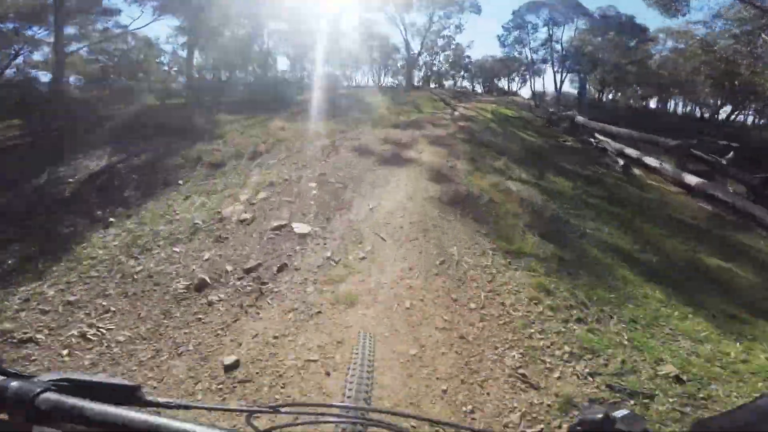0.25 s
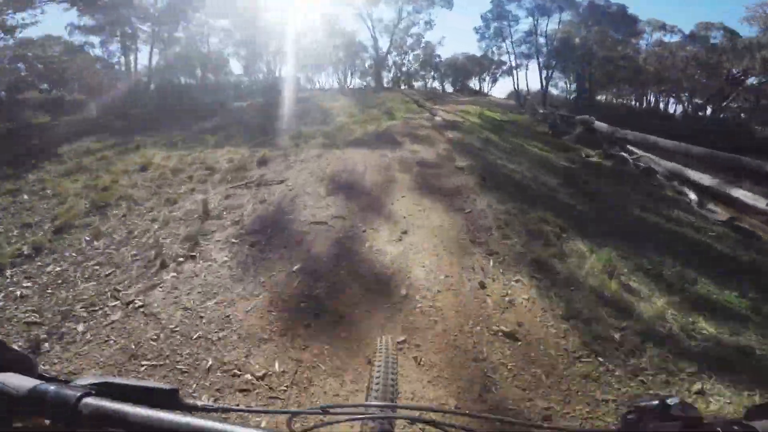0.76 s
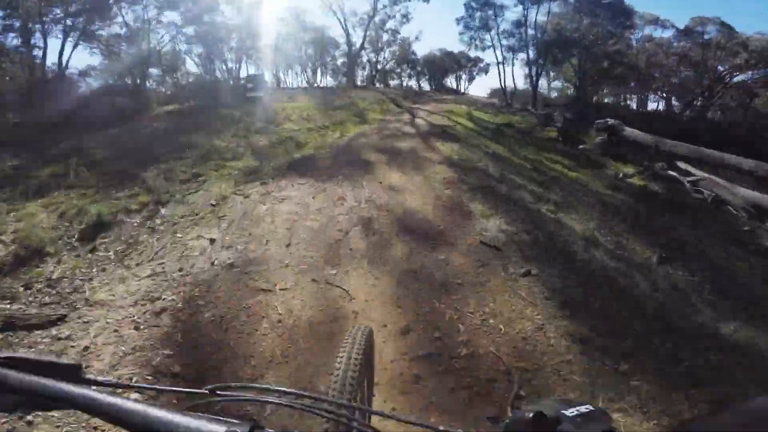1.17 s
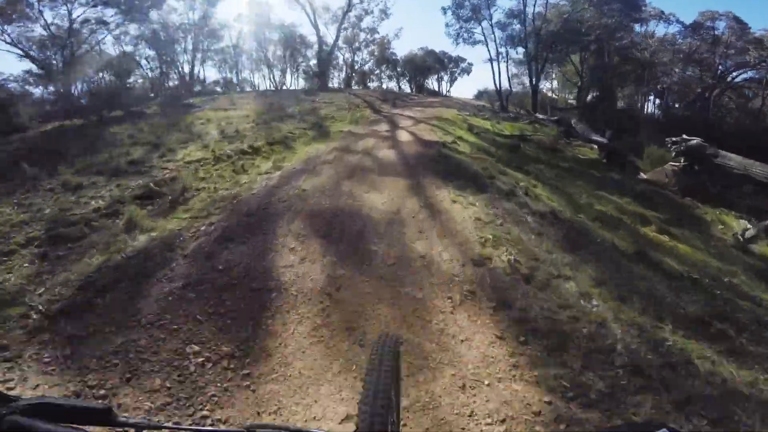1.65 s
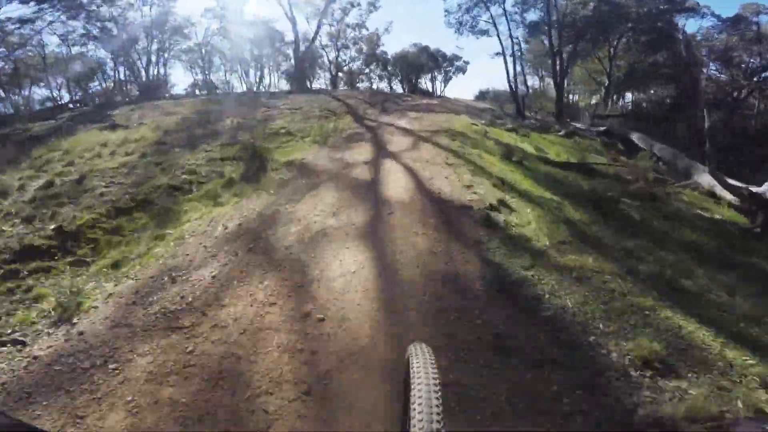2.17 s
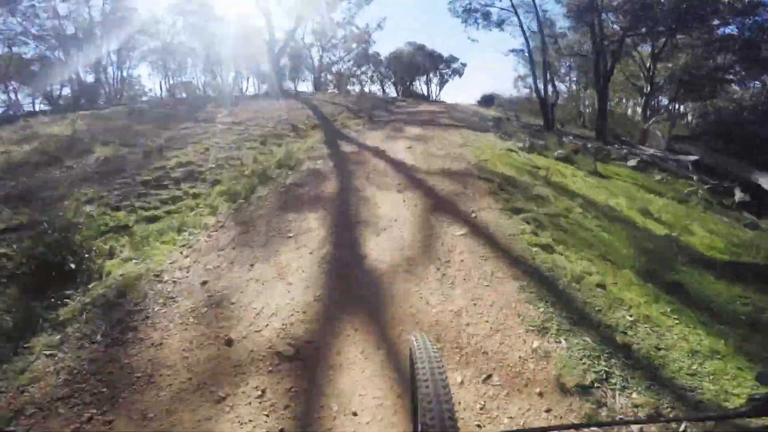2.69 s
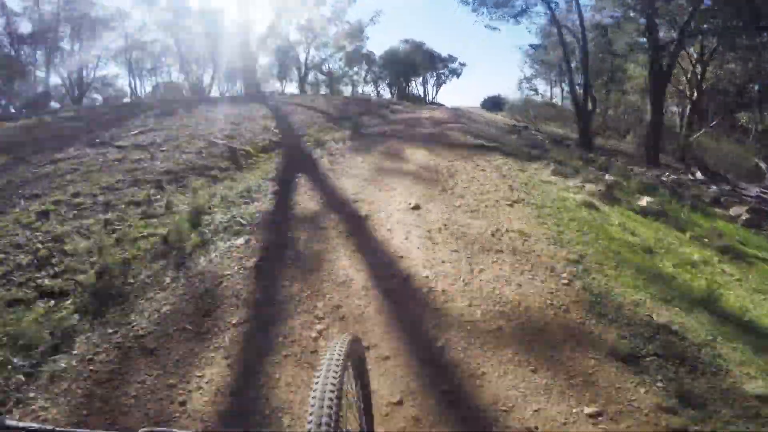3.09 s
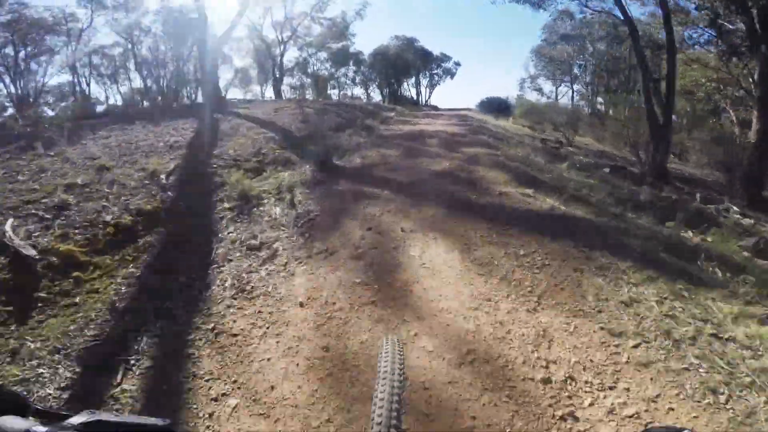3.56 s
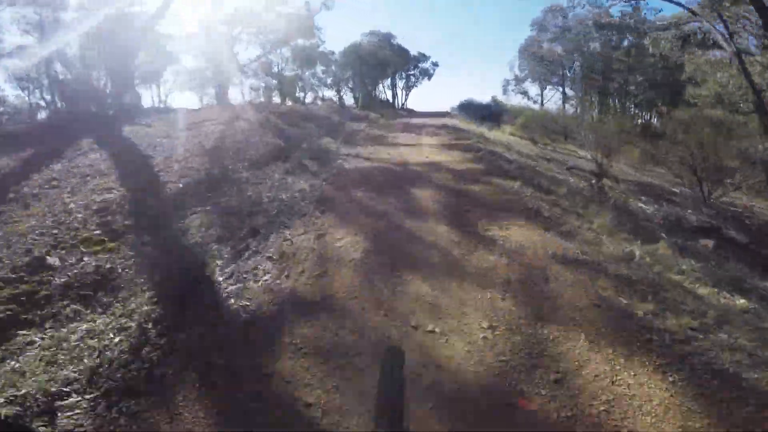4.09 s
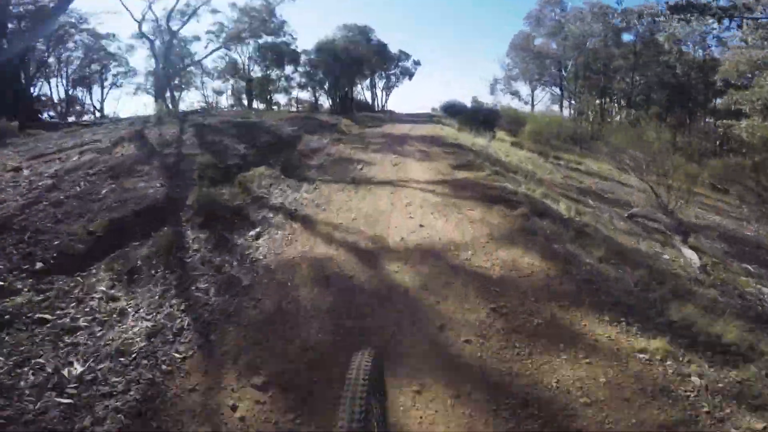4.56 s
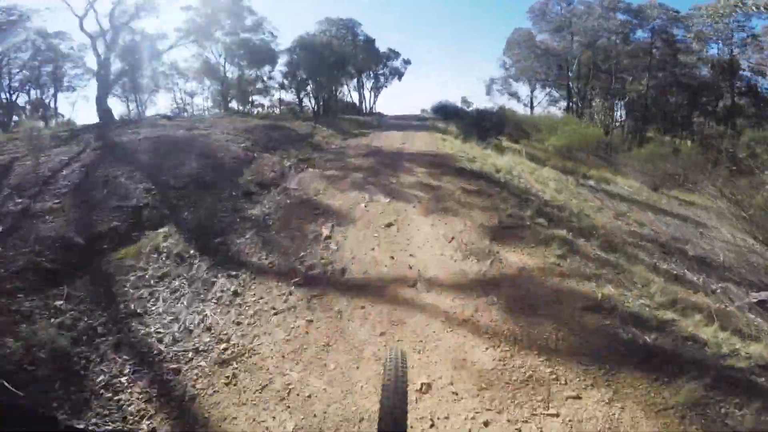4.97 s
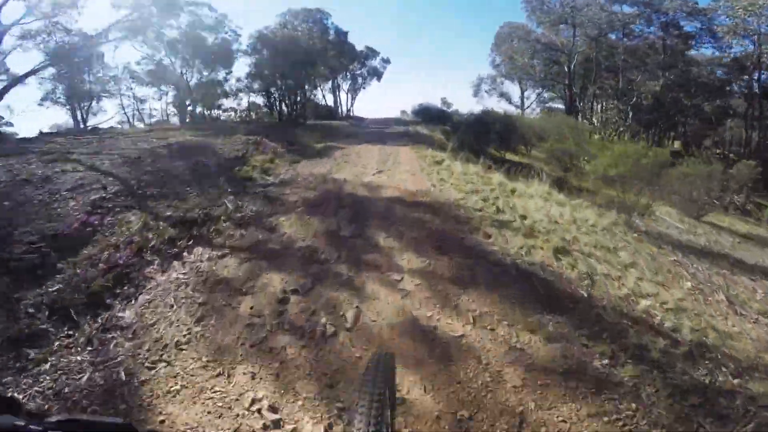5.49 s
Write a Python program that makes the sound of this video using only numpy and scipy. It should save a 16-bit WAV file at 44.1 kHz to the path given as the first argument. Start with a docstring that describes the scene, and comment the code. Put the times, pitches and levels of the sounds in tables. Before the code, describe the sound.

A mountain bike climbs a gravel trail, heard in mono from the rider's chest, close and dry in open air. Low wind buffeting thumps the microphone in short irregular gusts, while knobbly tyres make a low drumming rumble, gritty crunch and fine sandy hiss, swelling with every pedal push, about every 0.3 seconds. In the first 0.1 seconds chain and cables clatter brightly; lighter chatter follows around the strokes. Stones pop with dry cracks throughout, notably near 0.3, 1.1, 2.7, 4.15 and 5.15 seconds. Dull rock knocks land around 0.57, 1.6, 3.45 and 3.95. Tiny high steel pings touch at 0.34, 0.8, 1.3 and, very faintly, 3.65. Brief gravel showers crunch near 1.84, 3.5 and 5.1 to 5.3. From about 2 seconds wind and tyres ease, the strokes spreading to nearly half a second. Faint raspy squeaks come at 4.26, 4.35 and 4.66. It stops at about 5.7, still rolling.

```python
"""Mountain bike climbing a gravel trail

Close and outdoors, from a microphone on the rider's chest: gusts of low-passed noise thump it, and noise and
random scuffs make the knobbly tyres rumble and crunch over dirt, swelling with every pedal stroke.
Filtered cracks are stones popping loose; noise bursts are chain and cables chattering. Small steel parts ping,
rocks knock, something squeaks late on. The strokes spread out, and wind and tyres ease as the climb slows the bike.
"""
import sys
import numpy as np
from scipy import signal
from scipy.fft import rfft, irfft
from scipy.io import wavfile
from scipy.ndimage import uniform_filter1d

SR = 44100
rng = np.random.default_rng(int(sys.argv[2]) if len(sys.argv) > 2 else 0)


def master(y):
    """Save y as 16-bit WAV."""
    cut = np.clip(np.atleast_2d(y).T, -1, 1)
    pcm = np.round(cut * 32767)  # scale
    wavfile.write(sys.argv[1], SR, pcm.astype(np.int16))


N = 253134
TIME = np.arange(N) / SR

# pedal strokes pressing the tyres into the dirt: (time of hardest push [s], rumble swell [dB], crunch swell [dB])
STROKES = [(-.03, 6, 7.5), (.24, 2, 5), (.55, 3, 4), (.85, 5.5, 3.5), (1.14, 0.5, 7), (1.48, 4.5, 5.5),
           (1.85, 4, 6), (2.18, 4.5, 4), (2.5, 5, 5), (2.82, 5, 2.5), (3.2, 2.5, 4), (3.56, 4.5, 5),
           (3.95, 5, 5), (4.36, 0, 5), (4.83, 3, 6.5), (5.24, 1.5, 6), (5.71, 5.5, 3.5)]


def undb(db):
    """Decibels to gain."""
    return 10 ** (np.asarray(db) / 20)


def unit(x):
    """Scale to rms 1."""
    return x / np.sqrt(np.mean(x ** 2))


def curves(table):
    """Each column of a table, joined by straight lines in time."""
    s, *columns = np.transpose(table)
    return [np.interp(TIME, s, c) for c in columns]


def swells(table):
    """Level in dB of smooth humps, one for each row (time of centre [s], length [s], swell [dB])."""
    return sum(db * np.cos(np.pi * np.clip((TIME - s) / length, -.5, .5)) ** 2 for s, length, db in table)


def add(out, s, x):
    """Mix a short sound in at time s."""
    i = max(int(s * SR), 0)
    out[i:i + len(x)] += x[:max(N - i, 0)]


def decay(t, t60):
    """Exponential dying away, 60 dB down after t60 seconds."""
    return np.exp(-np.log(1000) * t / t60)


def resonate(x, hz, width):
    """Two-pole resonance, gain 1 at its centre; width in Hz."""
    hz = min(hz, SR * .44)
    return signal.lfilter(*signal.iirpeak(hz, hz / min(width, SR / 4), fs=SR), x)


def band(x, hz, octaves):
    """Steep band-pass reaching the given octaves either side of hz."""
    edges = np.clip(hz * 2. ** (np.array([-1, 1]) * octaves), 20, SR * .46)
    return signal.sosfilt(signal.butter(3, edges, "bandpass", fs=SR, output="sos"), x)


def colour(x, points, size=16384):
    """Causal filter with the given (Hz, dB) spectrum, so that clicks keep their sharp front; rms 1."""
    hz, db = np.transpose(points)
    bins = np.maximum(np.fft.rfftfreq(size, 1 / SR), 1)
    cepstrum = irfft(np.log(undb(np.interp(np.log(bins), np.log(hz), db))))
    # folding the cepstrum onto positive times makes the filter minimum-phase
    cepstrum[1:size // 2] *= 2
    cepstrum[size // 2 + 1:] = 0
    impulse_response = irfft(np.exp(rfft(cepstrum)))
    return unit(signal.fftconvolve(x, impulse_response)[:N])


def walk(rate):
    """Random wandering through about rate new values a second, rms 1."""
    knots = rng.standard_normal(N // 20)
    return unit(np.interp(TIME * rate, np.arange(len(knots)), knots))


def steady(x, span):
    """Take out swells slower than span seconds, leaving the fast flutter."""
    return x / np.sqrt(uniform_filter1d(x ** 2, max(int(span * SR), 2)) + 1e-4)


def halvings():
    """How many times the speed has halved since the start."""
    # the bike loses speed on the climb: (time [s], share of its starting speed)
    speed_points = [(0, 1.0), (1.5, 0.99), (2.2, 0.79), (3.7, .74), (4.5, 0.69), (5.3, 0.61), (5.74, 0.64)]
    speed, = curves(speed_points)
    return -np.log2(np.maximum(speed, .1))


def pedalling():
    """Swell of rumble and of crunch in dB: greatest mid-stroke, gone as the cranks pass dead centre."""
    sharpness = 0.71  # higher makes each push narrower
    turn = np.interp(TIME, np.transpose(STROKES)[0], np.arange(len(STROKES)))
    push = (np.cos(np.pi * turn) ** 2) ** sharpness
    return [push * swell_db for swell_db in curves(STROKES)]


def around_strokes(db, hz, scatter_s, spread_db, octaves, count):
    """Rows (time [s], level [dB], pitch [Hz]) of small random events, count of them near each push."""
    pushes = np.repeat(np.transpose(STROKES)[0], count)
    when, force, pitch = np.clip(rng.standard_normal((len(pushes), 3)), -2, 2).T
    rows = zip(pushes + scatter_s * when, db + spread_db * force, hz * 2 ** (octaves * pitch))
    return [row for row in rows if row[0] > 0]


def wind():
    """Eddies thump the microphone, gust by gust, easing as the bike slows."""
    # spectrum of the buffeting: (frequency [Hz], relative level per Hz [dB])
    wind_colour = [(8, -28), (20, -2), (38, 0.5), (60, -3), (95, -10), (150, -19.5), (300, -41),
                   (900, -81.5)]
    # gusts on the microphone: (time of centre [s], length [s], swell [dB])
    gusts = [(.005, 0.046, 7), (.125, 0.11, 5), (0.532, 0.042, 4.5), (.615, 0.069, 6), (1.127, 0.3, 1),
             (1.34, 0.071, 9.5), (1.447, 0.089, 7), (1.776, 0.028, 7.5), (1.9, 0.24, 4.5),
             (2.337, 0.055, 7), (2.507, 0.059, 10.5), (2.718, 0.22, 6), (3.087, 0.043, 9),
             (3.267, 0.18, 8.5), (3.625, 0.065, 8.5), (4.33, 0.1, 5.5), (4.446, 0.13, 7), (4.57, 0.2, 5.5),
             (4.93, 0.22, 4.5)]
    start_db, db_per_halving = -23, 10.5  # level between gusts at the starting speed; loss when speed halves
    eddies = steady(colour(rng.standard_normal(N), wind_colour), span=0.079)
    return eddies * undb(start_db - db_per_halving * halvings() + swells(gusts))


def grains(rate, spread_db, low_hz, high_hz, width_share, scuff_s, count=6):
    """Stones of several sizes scuff at random, many faint and few loud; small ones sound higher."""
    out, fade = 0, np.exp(-1 / (scuff_s * SR))
    for hz in np.geomspace(low_hz, high_hz, count):
        struck = rng.random(N) < rate / count / SR
        force = undb(spread_db * np.minimum(rng.exponential(size=N), 4))
        # two equal poles let each contact build up briefly before it fades
        power = signal.lfilter([1], np.poly([fade, fade]), struck * force ** 2 + 1e-12)
        scuffs = np.sqrt(power) * rng.standard_normal(N)
        out = out + resonate(scuffs, hz, hz * width_share)
    return unit(out)


def pebbles(rate, spread_db, centre_hz, octaves, cycles, size=512):
    """Single pebbles clink, each at its own pitch and for a few cycles."""
    out, t = np.zeros(N), np.arange(size) / SR
    for when, pitch, force, ring in rng.random((4000, 4))[:int(rate * N / SR)]:
        hz = centre_hz * 2 ** (octaves * (2 * pitch - 1))
        age = hz * t / (cycles * (.5 + ring))
        db = spread_db * min(-np.log(1 - force), 3)
        add(out, when * N / SR, undb(db) * age * np.exp(-age) * np.sin(2 * np.pi * hz * t))
    return unit(out)


def tyres():
    """Knobs drum on hard dirt, crush gravel in uneven patches and throw up fine sand."""
    # spectra of drumming, gravel and sand: (frequency [Hz], relative level per Hz [dB])
    rumble_colour = [(50, -20.5), (110, -2.5), (160, -2), (200, -2.5), (245, 1.5), (280, -3), (400, -7.5),
                     (520, -9.5), (700, -17.5), (1100, -19), (3000, -57)]
    gravel_colour = [(250, -12), (600, 6), (900, 3.5), (1200, -1.5), (1550, 5), (1950, 0.5), (2650, 5.5),
                     (3300, 2), (4200, -3), (5500, -13), (9000, -22.5), (16000, -36)]
    sand_colour = [(2500, -17), (4500, 7.5), (5700, 4.5), (6800, 4.5), (8500, -5.5), (10000, -6),
                   (10700, -7), (11600, -9), (12500, -10), (14800, -15), (16000, -31)]
    # ruts and ridges under the wheels: (time of centre [s], length [s], rumble swell, or dip if negative [dB])
    bumps = [(.005, 0.028, 6), (.69, 0.2, 3), (1.6, .05, 7.5), (2.215, .06, 2), (3.24, .1, 5),
             (3.6, 0.15, 2.5), (3.945, 0.038, 7), (4.06, 0.041, -3.5), (5.57, 0.066, 2.5)]

    # levels in dB: at the starting speed, less a loss for each halving of speed, plus the swells
    slowed = halvings()
    rumble_swell, crunch_swell = pedalling()
    rumble_db = -35.5 - 11.5 * slowed + rumble_swell + swells(bumps)
    crunch_db = -40 - 4 * slowed + crunch_swell
    sand_db = -52.5 - 8 * slowed + 0.9 * crunch_swell

    patches = walk(rate=110)  # one uneven ground roughens all three layers, by differing amounts in dB
    drumming = steady(colour(rng.standard_normal(N), rumble_colour), span=0.066) * undb(1.0 * patches)

    grinding = grains(rate=2500, spread_db=2.0, low_hz=910, high_hz=5960, width_share=0.86, scuff_s=0.00037)
    clinks = pebbles(rate=420, spread_db=4, centre_hz=2294, octaves=1.164, cycles=1.9)
    gravel = colour(grinding + undb(-11.5) * clinks + undb(-6) * rng.standard_normal(N), gravel_colour)
    gravel = steady(gravel * undb(2.4 * patches), span=0.093)

    spray = grains(rate=350, spread_db=9.5, low_hz=4930, high_hz=12700, width_share=0.57, scuff_s=0.0003)
    ticks = pebbles(rate=130, spread_db=5.5, centre_hz=7140, octaves=0.84, cycles=4.0)
    sand = colour(spray + undb(-1.5) * ticks + undb(6.5) * rng.standard_normal(N), sand_colour)
    sand = steady(sand * undb(2.8 * patches), span=0.2)
    return drumming * undb(rumble_db) + gravel * undb(crunch_db) + sand * undb(sand_db)


def rattles(size=4096):
    """Hard parts chatter together in a burst that swells, rings briefly at its pitch and dies."""
    # clatters of chain and cables on the frame:
    # (time [s], level before the common trim [dB], pitch [Hz], 60 dB decay of the chatter [s])
    clatters = [(0.0287, -8, 3050, .025), (.0285, -13, 7200, 0.016), (0.0365, -6.5, 3460, 0.024),
                (.036, -13, 7100, 0.027), (0.0667, -13, 6500, 0.023), (0.0658, -11.5, 4160, 0.027),
                (.073, -9, 11200, 0.005), (.236, -18.5, 5300, 0.015), (.4768, -11.5, 11600, .0098),
                (.564, -22, 4440, 0.032), (1.3975, -21.5, 5460, .026), (1.4516, -21, 5500, 0.034),
                (1.569, -25.5, 8050, 0.01), (1.587, -25, 9500, .015), (2.102, -31, 9050, 0.011),
                (2.49, -19, 5900, 0.055), (3.083, -28, 6000, .036), (3.157, -26, 6040, 0.025),
                (2.8178, -19, 3830, 0.027), (3.9, -29, 6700, .05), (3.9468, -17, 3470, .013),
                (4.32, -23, 3430, .03), (4.527, -21.5, 3580, 0.011), (4.802, -25, 3900, .022),
                (5.0366, -19, 6600, 0.0058), (5.23, -17, 3550, .02), (5.261, -17, 3560, 0.03),
                (5.596, -25, 5640, .025), (5.631, -25.5, 6100, .025), (5.66, -27, 5230, .02)]
    trim_db, light_t60 = -6.5, 0.031
    out, t = np.zeros(N), np.arange(size) / SR
    # light chatter of the chain around each push
    light = around_strokes(db=-28, hz=6100, scatter_s=.06, spread_db=-2.0, octaves=0.32, count=1)
    for s, db, hz, t60 in clatters + [(*row, light_t60) for row in light]:
        chatter = rng.standard_normal(size) * decay(t, t60) * (1 - np.exp(-t / 0.00017))
        ring = resonate(band(chatter, hz, octaves=0.33), hz, width=240)
        body = resonate(chatter, hz, width=1300)
        clack = band(chatter, hz, octaves=0.47) + undb(9) * body + undb(10.5) * ring
        add(out, s - .0005, clack / np.abs(clack).max() * undb(db + trim_db))
    return out


def stones(size=2048):
    """A pinched stone snaps free with a dry crack and scuffs briefly; its pitch picks which modes ring most."""
    # stones popping from under the tyres: (time [s], level before the common trim [dB], pitch [Hz])
    pops = [(.0384, -13, 1670), (0.075, -11.5, 2100), (.269, -11.5, 1770), (.3077, -16.5, 1860),
            (.5654, -15, 1800), (1.041, -17, 2600), (1.1331, -11.5, 2500), (1.152, -14.5, 1950),
            (1.1983, -14, 2440), (1.5477, -14, 2470), (1.588, -15, 1860), (1.679, -13.5, 2660),
            (1.708, -16, 2550), (1.843, -18, 1780), (1.8527, -17, 1680), (1.969, -13, 2130),
            (2.0238, -16.5, 2210), (2.705, -10, 2620), (3.11, -14.5, 1960), (3.4476, -12, 1630),
            (3.5447, -12, 2100), (3.83, -16.5, 1970), (4.0131, -12, 1900), (4.1535, -9.5, 2680),
            (4.1593, -11, 2470), (4.573, -13.5, 1830), (4.6318, -14, 1630), (4.7457, -17, 2000),
            (5.156, -9, 2430), (5.3021, -10.5, 1700), (5.7134, -16.5, 1800)]
    # what every stone rings with: (frequency [Hz], width [Hz], level [dB])
    stone_modes = [(856, 250, 19), (1430, 500, 9.5), (2500, 660, 11), (3200, 590, -39), (6300, 3100, -47)]
    trim_db = -2.0
    out, t = np.zeros(N), np.arange(size) / SR
    # smaller stones, squeezed out around each push
    small = around_strokes(db=-22.5, hz=2090, scatter_s=0.072, spread_db=0.5, octaves=0.44, count=2)
    for s, db, hz in pops + small:
        scuff = rng.standard_normal(size) * np.exp(-t / 0.0018)
        push = signal.unit_impulse(size) + undb(-25) * scuff
        push = band(push, hz, octaves=0.61) + undb(-22) * push
        pop = sum(undb(mode_db) * resonate(push, f, width) for f, width, mode_db in stone_modes)
        add(out, s - .0005, pop / np.abs(pop).max() * undb(db + trim_db))
    return out


def crunches():
    """A pocket of gravel gives way in a short shower of cracks."""
    # pockets of coarse gravel crushed under a tyre: (time [s], length [s], rms level [dB], pitch [Hz])
    pockets = [(0.139, .024, -36.5, 1520), (0.235, .022, -38, 1700), (1.446, 0.017, -35.5, 3350),
               (1.838, .022, -30.5, 1800), (2.484, 0.03, -36.5, 2180), (3.53, 0.04, -36, 2700),
               (3.986, 0.045, -40, 2200), (4.771, 0.034, -40, 2100), (5.082, 0.03, -35.5, 1950),
               (5.295, 0.048, -36.5, 2180), (5.71, 0.019, -32.5, 1780)]
    out = np.zeros(N)
    cracks = grains(rate=900, spread_db=4.0, low_hz=1170, high_hz=4300, width_share=0.44, scuff_s=0.00053)
    for s, length, db, hz in pockets:
        n = int(length * SR)
        shower = band(cracks[min(int(s * SR), N - n):][:n], hz, octaves=0.53)
        add(out, s, unit(shower * np.sqrt(np.hanning(n))) * undb(db))
    return out


def pings(size=4096):
    """Small steel parts touch and ring high, as a sum of dying sines."""
    # light touches: (time [s], level [dB])
    touches = [(.337, -28), (.803, -33), (1.297, -35), (3.655, -41)]
    # modes of the steel: (frequency [Hz], level within the ping [dB], 60 dB decay [s])
    steel_modes = [(10430, -7.5, 0.032), (14100, -28, .025)]
    out, t = np.zeros(N), np.arange(size) / SR
    ring = sum(undb(db) * np.sin(2 * np.pi * hz * t) * decay(t, t60) for hz, db, t60 in steel_modes)
    for s, db in touches:
        add(out, s, ring * undb(db))
    return out


def knocks(size=4096):
    """A rock gives the wheel a dull, quickly damped blow: a dying sine with a wavering phase."""
    # blows from embedded rocks: (time [s], level [dB], pitch [Hz], 60 dB decay [s])
    blows = [(.565, -16, 810, 0.011), (1.586, -19.5, 450, 0.023), (1.712, -26, 595, 0.052),
             (3.4478, -22, 800, 0.02), (3.9457, -15, 730, 0.024), (5.3018, -25, 915, .012)]
    attack_s = 0.0002
    out, t = np.zeros(N), np.arange(size) / SR
    for s, db, hz, t60 in blows:
        phase = 2 * np.pi * hz * t + 0.52 * walk(rate=570)[:size]
        add(out, s, undb(db) * np.sin(phase) * (1 - np.exp(-t / attack_s)) * decay(t, t60))
    return out


def squeaks():
    """Something rubs for a moment with a raspy, gliding tone."""
    # faint rubs of the running gear: (time [s], length [s], start pitch [Hz], end pitch [Hz], level [dB])
    rubs = [(4.259, 0.058, 1444, 1690, -41), (4.35, 0.067, 1560, 1464, -38.5),
            (4.662, 0.069, 1650, 1550, -43)]
    out, waver = np.zeros(N), walk(rate=450)
    for s, length, start_hz, end_hz, db in rubs:
        n = int(length * SR)
        # the fast waver of pitch makes the rasp
        hz = np.linspace(start_hz, end_hz, n) * (1 + 0.038 * waver[int(s * SR):][:n])
        tone = np.sin(2 * np.pi * np.cumsum(hz) / SR)
        add(out, s, undb(db) * np.sqrt(2 * np.hanning(n)) * tone)
    return out


def scene():
    """Everything is close and in the open air, so nothing echoes; one channel."""
    ground = tyres() + stones() + crunches() + knocks()
    bike = rattles() + pings() + squeaks()
    return (wind() + ground + bike)[None]


def record(dry):
    """The microphone's steep low-pass cuts the top."""
    top_hz = 15400
    return signal.sosfilt(signal.ellip(8, .2, 70, top_hz, fs=SR, output="sos"), dry)


dry = scene()
out = record(dry)
master(out)
```